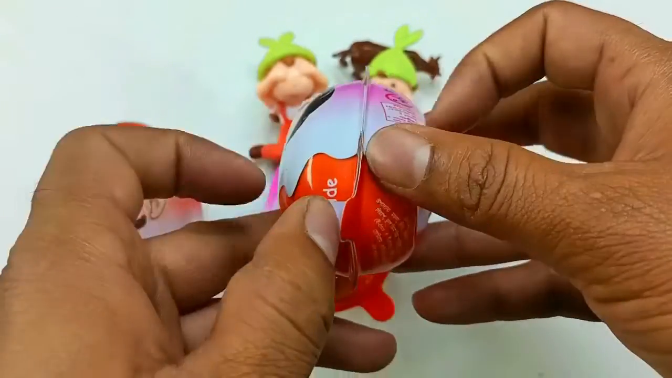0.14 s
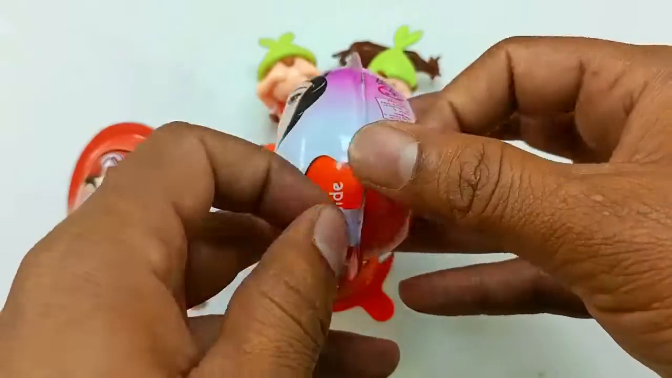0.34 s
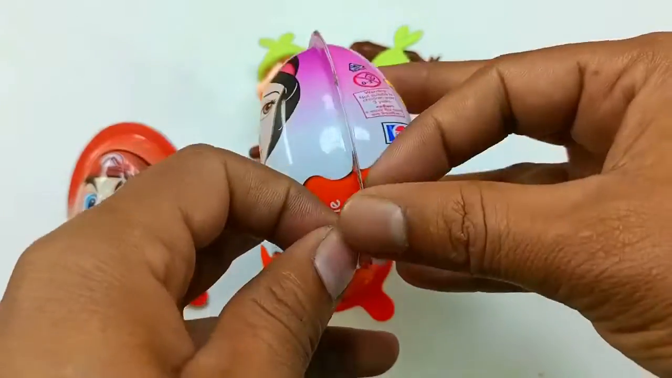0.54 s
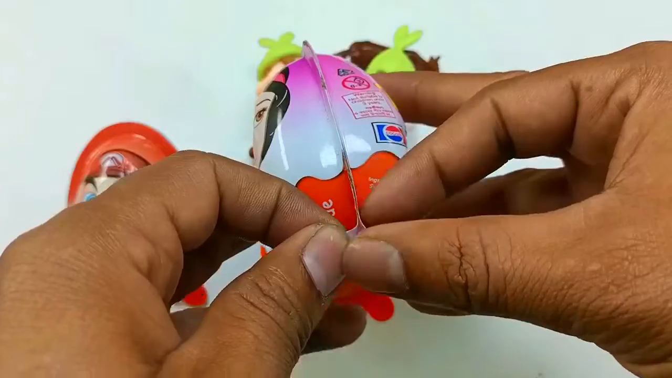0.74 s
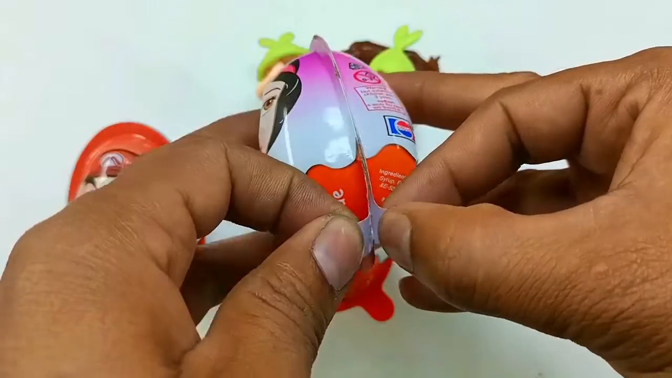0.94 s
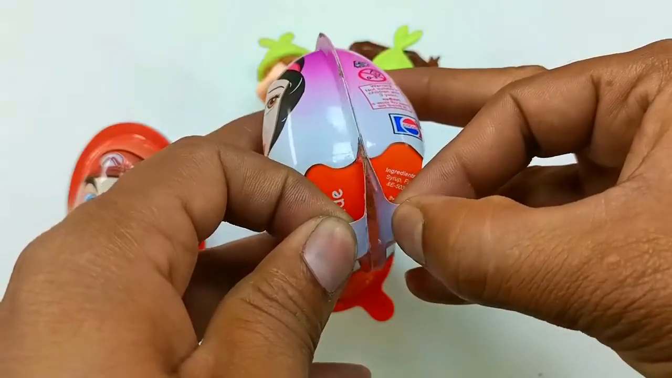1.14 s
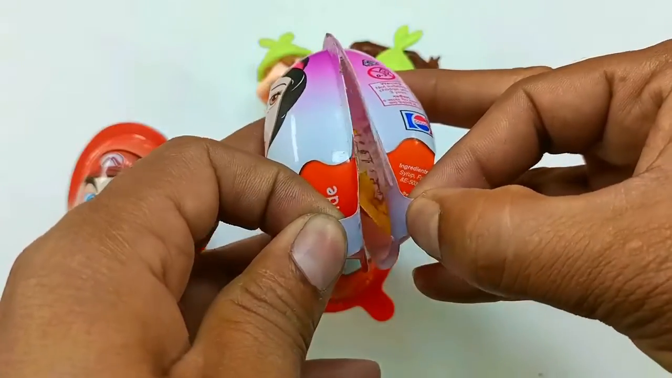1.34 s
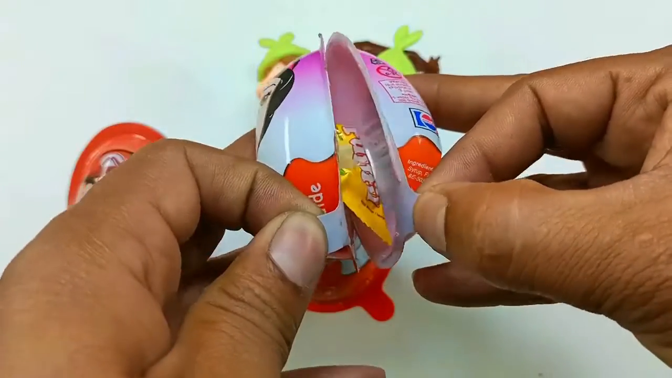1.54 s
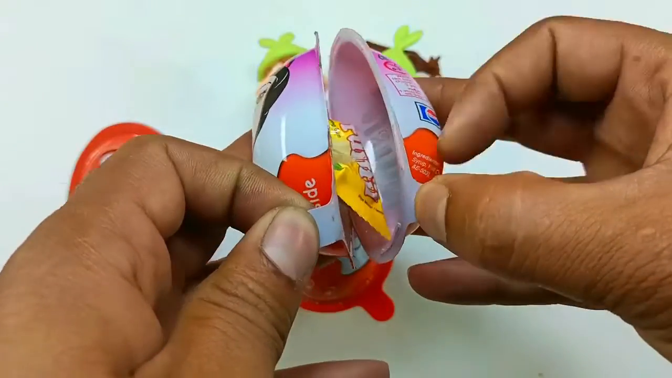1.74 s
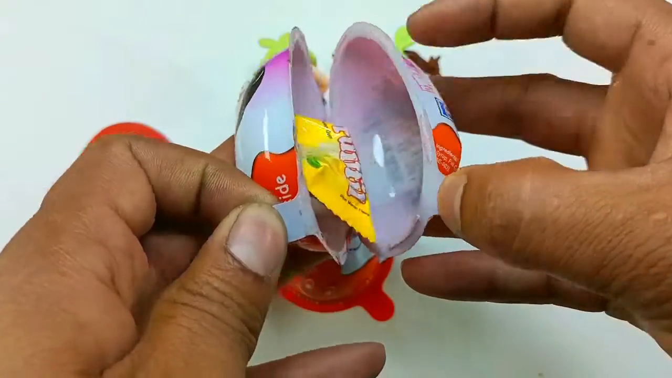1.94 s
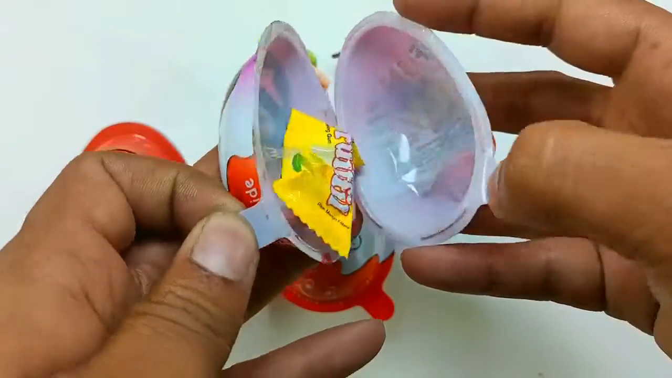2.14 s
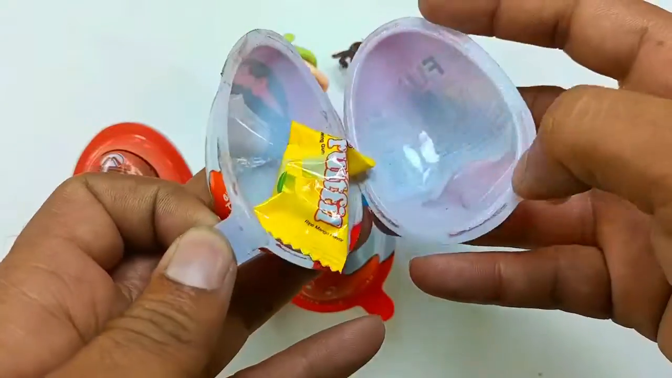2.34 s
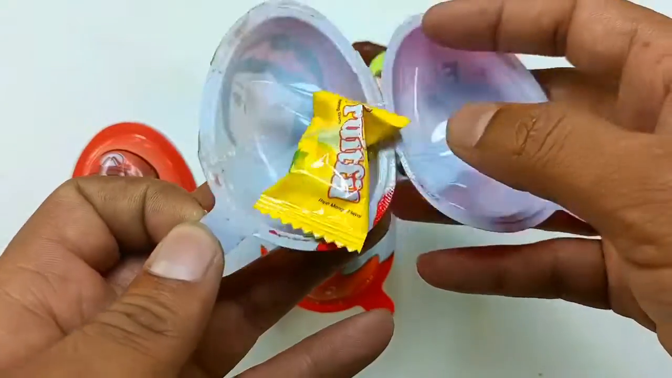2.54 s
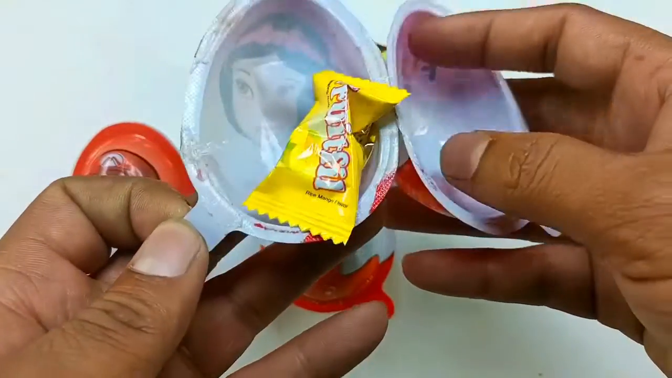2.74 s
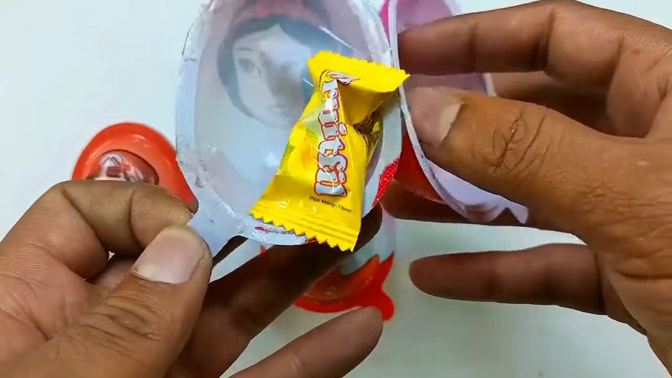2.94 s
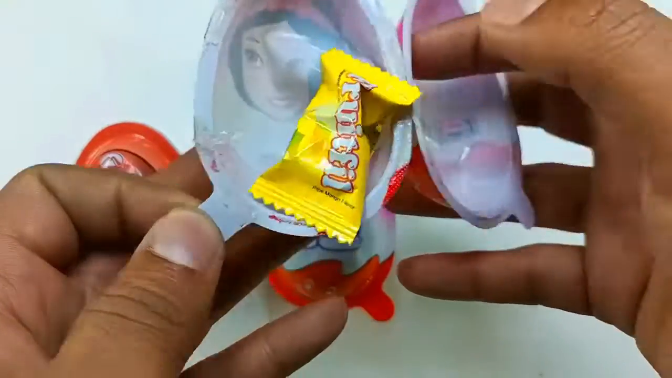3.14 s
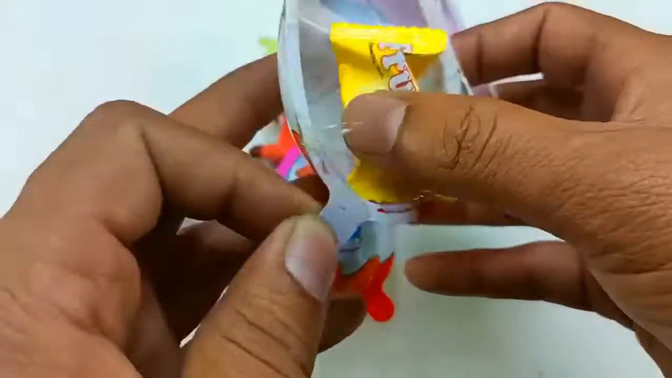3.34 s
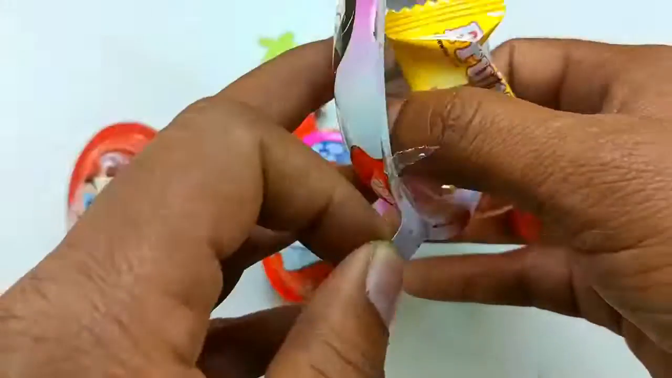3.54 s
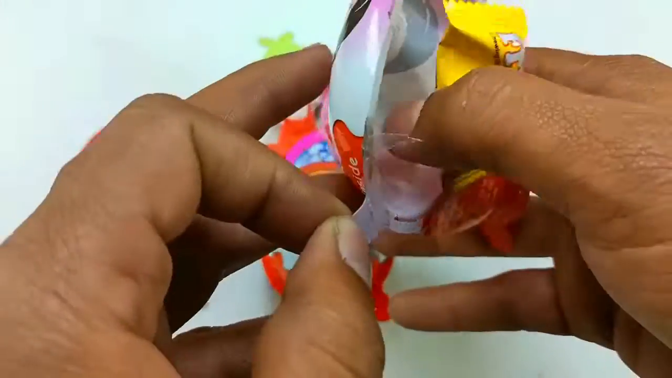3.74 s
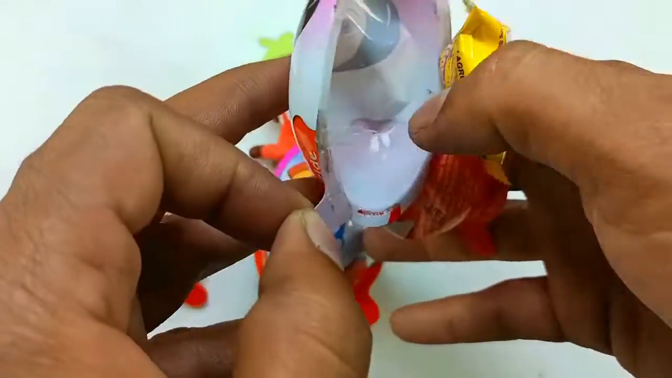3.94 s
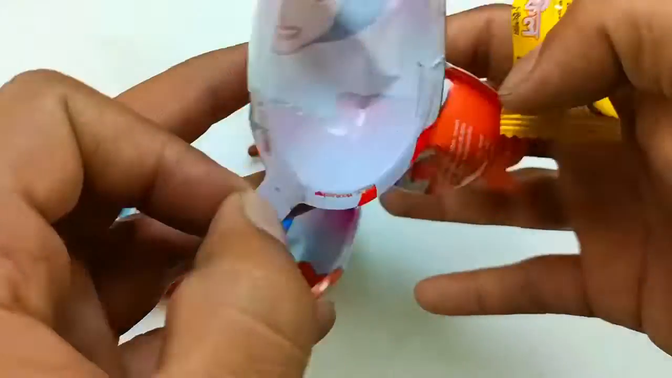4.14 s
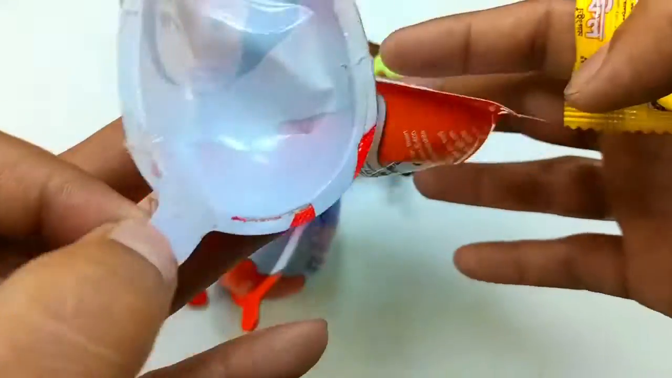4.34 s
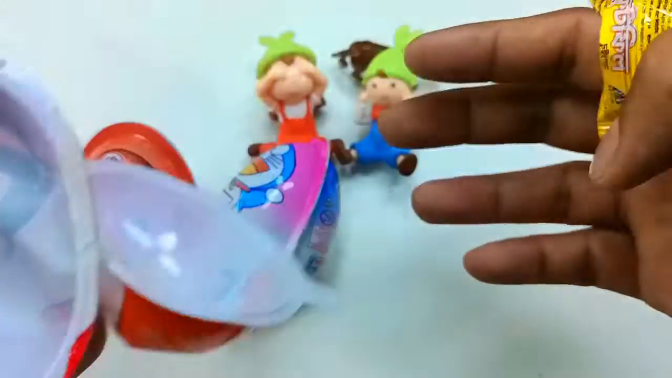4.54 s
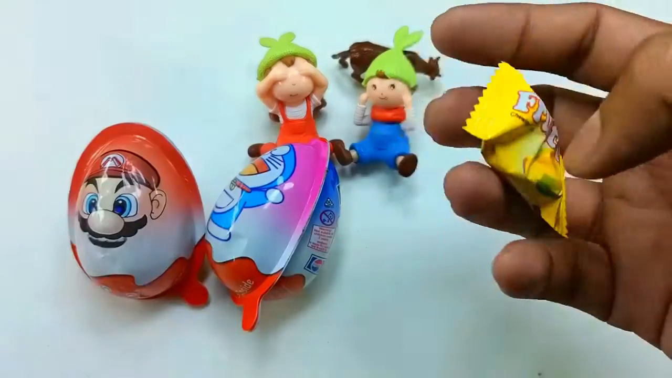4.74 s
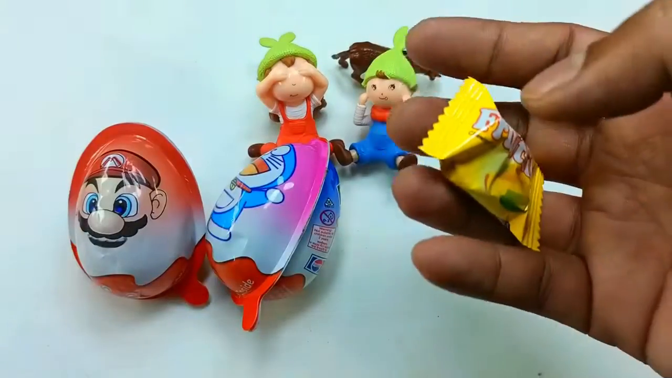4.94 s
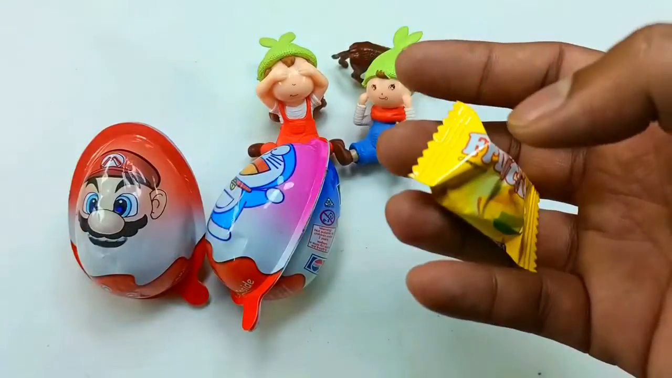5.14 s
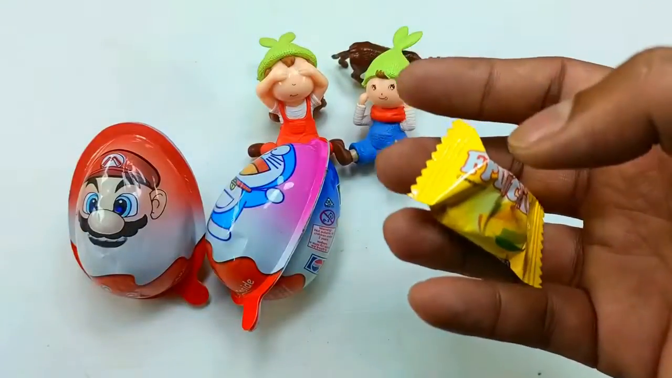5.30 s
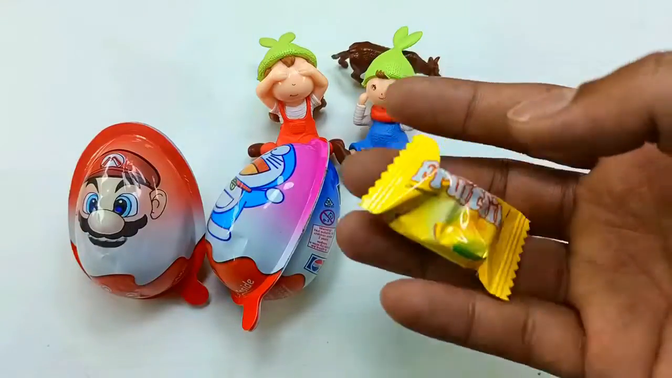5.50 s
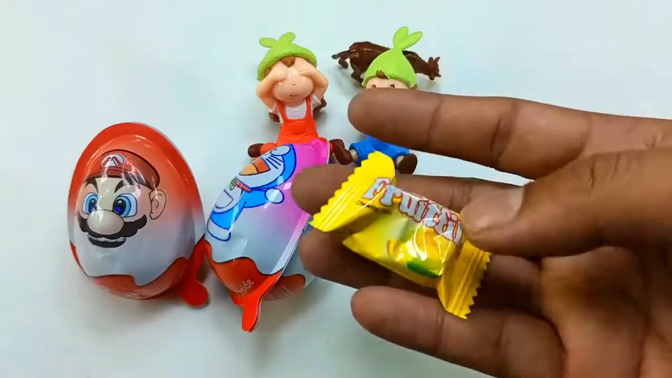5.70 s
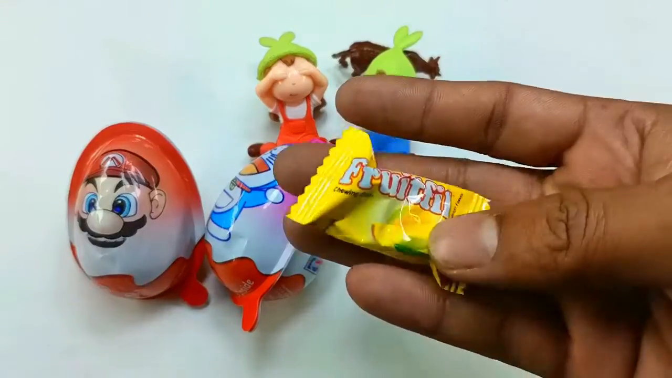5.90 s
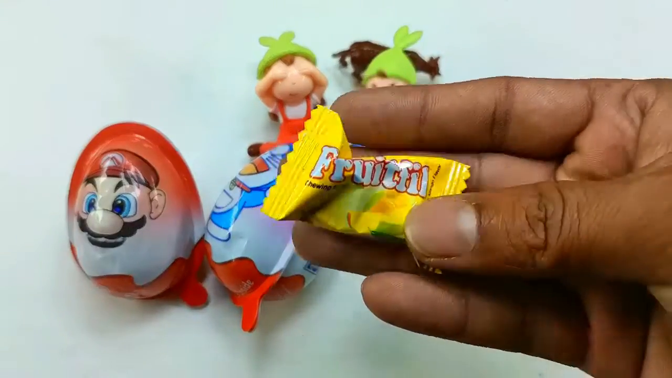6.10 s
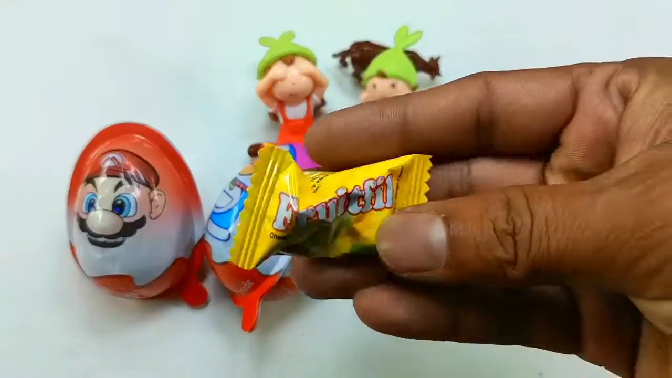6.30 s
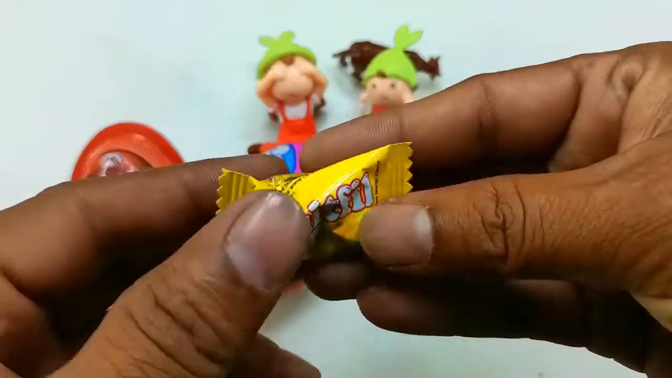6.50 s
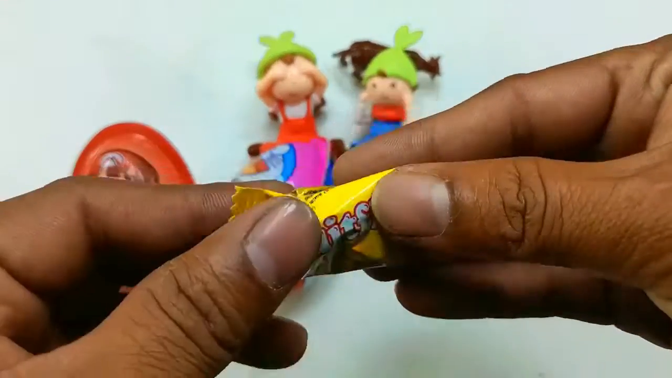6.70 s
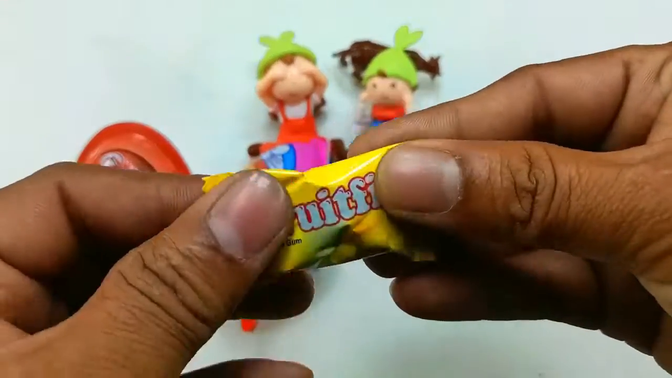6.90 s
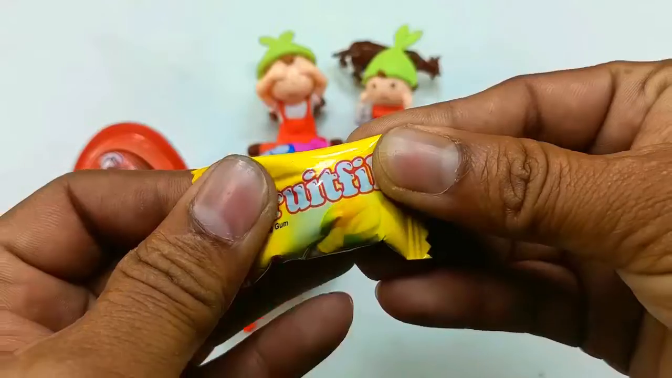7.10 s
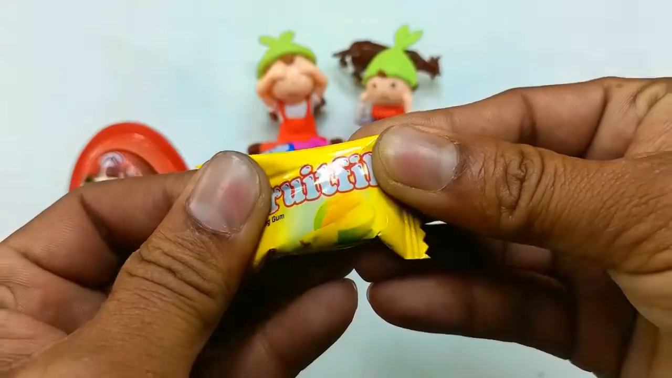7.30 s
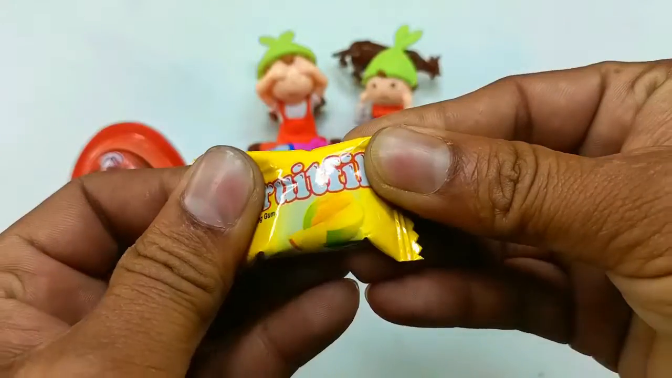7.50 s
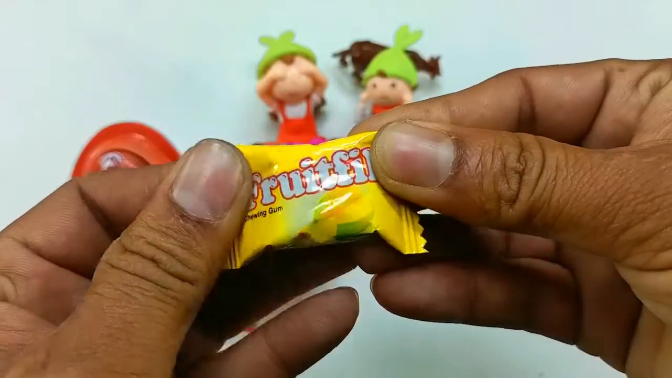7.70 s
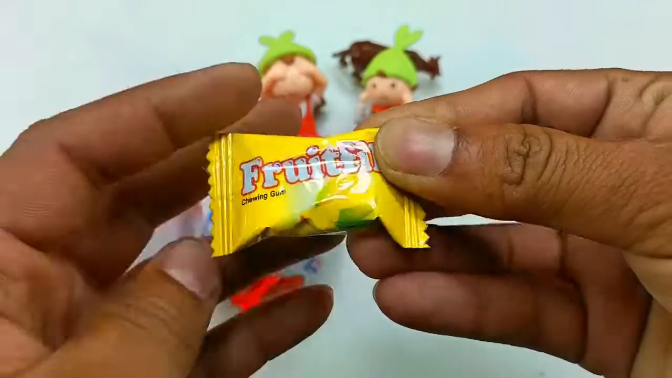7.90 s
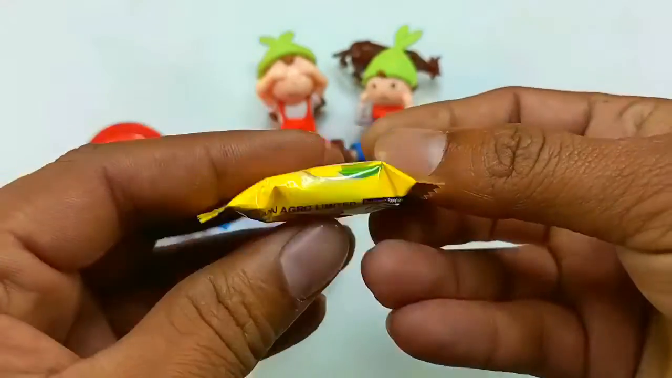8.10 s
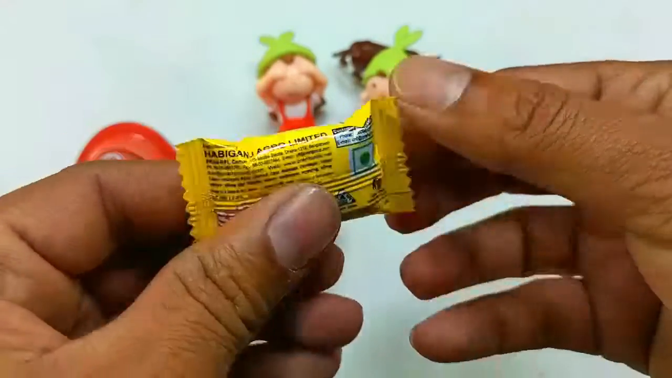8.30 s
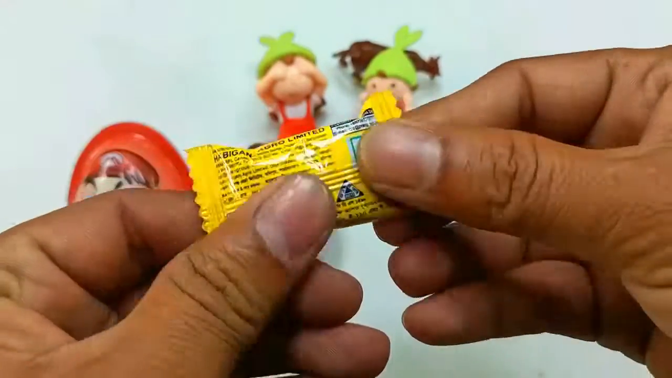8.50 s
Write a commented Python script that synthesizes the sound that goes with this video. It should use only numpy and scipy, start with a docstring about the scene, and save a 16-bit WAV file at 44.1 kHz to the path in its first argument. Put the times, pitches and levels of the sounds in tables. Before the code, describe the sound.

In a quiet indoor room with faint low hum, close stereo microphones catch fingertips rubbing thin plastic, with soft ticks and a slight squeak. Around 0.85 seconds the seam starts to crack; loud hollow pops burst out at 1.2, 1.4 and 1.6, each very short and dry with a brief room echo. From 2.1 to 3.6 the opened shell gives small clicks, rustles, tiny squeaks and dull finger bumps. A stronger hollow snap comes at 3.8, lighter cracks until 4.4, then faint scuffs as it is put down. Foil ticks softly at 4.8, and near-quiet follows, with a light crackle at 5.5 and gentle rubbing around 6. From 6.8 the wrapper crinkles, peaking in a bright, sharp burst at 7.05, with isolated snaps near 7.4 and 7.7, some carrying a low pulse. A dense crisp crackle fills 8.2 to 8.5.

```python
"""At a table in a quiet room, close to a pair of microphones, hands pry a thin plastic shell open,
turn it over, then press a small foil wrapper. The shell cracks (noise bursts) and rings in its hollow
(damped sines), the foil snaps brightly (wider noise bursts). Fingers rub, squeak and thud (filtered noise),
some snaps carry low pulses, and a hum lies under the room noise.
A noise gate lets the background sink whenever the hands are still."""
import sys
import numpy as np
from scipy import signal
from scipy.fft import rfft, irfft
from scipy.io import wavfile
from scipy.ndimage import uniform_filter1d

SR = 44100
rng = np.random.default_rng(int(sys.argv[2]) if len(sys.argv) > 2 else 0)


def digitize_waveform(pressure):
    """Quantize a signal to 16-bit integers and store it at the path in sys.argv[1].

    Rows of a 2-D input are taken as channels; values are limited to [-1, 1].
    """
    field = np.atleast_2d(pressure).T
    bounded = np.clip(field, -1, 1)
    quanta = np.round(bounded * 32767).astype(np.int16)
    wavfile.write(sys.argv[1], SR, quanta)


N = 377055

# Finger strokes over plastic and foil. Each row: start in seconds, length in seconds,
# dull body rustle in dB, bright skin rustle in dB (both rms before the swell of the stroke).
STROKES = [(0, 0.088, -65.5, -71), (0.22, 0.12, -61, -67), (0.436, 0.17, -55, -64),
           (0.629, 0.14, -63.5, -82), (0.8, 0.1, -59.5, -69.5), (1.065, 0.23, -65.5, -60.5),
           (1.53, 0.061, -53.5, -62), (2.072, 0.13, -68, -68), (2.17, 0.32, -58.5, -60),
           (2.46, 0.12, -64, -68.5), (2.634, 0.18, -53, -59.5), (2.778, 0.21, -72, -77.5),
           (3.052, 0.13, -56, -65), (3.348, 0.16, -68, -71), (3.469, 0.12, -48, -53),
           (3.613, 0.13, -46.5, -54.5), (3.743, 0.21, -69, -68.5), (3.963, 0.25, -63, -64.5),
           (4.101, 0.19, -65.5, -73.5), (4.288, 0.13, -65.5, -65), (4.496, 0.061, -63.5, -80),
           (4.82, 0.07, -59.5, -59.5), (5.514, 0.26, -67.5, -68), (5.761, 0.2, -64.5, -58.5),
           (5.853, 0.057, -62.5, -53.5), (5.959, 0.25, -65.5, -58), (6.059, 0.046, -64.5, -59),
           (6.167, 0.26, -78, -63.5), (6.397, 0.089, -80.5, -63), (6.491, 0.08, -81.5, -62.5),
           (6.594, 0.045, -79.5, -67.5), (6.664, 0.125, -79, -70), (6.786, 0.16, -58.5, -56),
           (6.991, 0.2, -67, -52), (7.868, 0.11, -56, -53.5), (8.236, 0.17, -50.5, -52)]

FOIL_FROM_S = 4.7   # the shell is put down, the wrapper taken up
LEAD_S = .008   # short rise ahead of each crack


def amp(db):
    """Decibels to gain."""
    return 10 ** (np.asarray(db) / 20)


def rms_one(x):
    """Scale to unit rms."""
    return x / np.sqrt(np.mean(x ** 2) + 1e-20)


def band(x, low_hz, high_hz):
    """Butterworth band-pass."""
    edges_hz = [low_hz, min(high_hz, .45 * SR)]
    return signal.sosfilt(signal.butter(2, edges_hz, "band", fs=SR, output="sos"), x)


def resonance(x, hz, width_hz):
    """Two-pole resonance with gain 1 on top."""
    r = np.exp(-np.pi * width_hz / SR)
    feedback = [1, -2 * r * np.cos(2 * np.pi * hz / SR), r * r]
    return signal.lfilter([(1 - r * r) / 2, 0, (r * r - 1) / 2], feedback, x)


def dying(seconds, t60):
    """Envelope falling 60 dB in t60 seconds."""
    return amp(-60 * np.arange(int(seconds * SR)) / SR / t60)


def stereo_noise(size, alike):
    """Two channels of noise whose correlation is alike, from 0 to 1."""
    mid, side = rng.standard_normal((2, size))
    alike = np.clip(alike, 0, 1)
    return np.sqrt((1 + alike) / 2) * mid + np.sqrt((1 - alike) / 2) * side * [[1], [-1]]


def add(out, s, burst, db):
    """Mix a burst in with its peak at the given level."""
    at = max(int(s * SR), 0)
    burst = burst[:, :N - at]
    out[:, at:at + burst.shape[1]] += amp(db) * burst / np.abs(burst).max()


def background():
    """Room noise and a slightly wavering mains hum, both stronger on the left."""
    # Spectrum of the room's air. Each row: frequency in Hz, relative density in dB per Hz.
    air_curve = np.array([(20, -14), (45, -11), (100, -11), (170, -16.5), (330, -23), (480, -20),
                          (850, -31), (2200, -34.5), (4000, -45), (16000, -50)])
    air_db, hum_db, hum_hz = -68.5, -69.5, 100.5   # rms levels ahead of the left-right tilt
    hz = np.maximum(np.arange(N // 2 + 1) * SR / N, 1)
    curve_db = np.interp(np.log(hz), np.log(air_curve[:, 0]), air_curve[:, 1])
    air = irfft(rfft(stereo_noise(N, 1.0)) * amp(curve_db), N)
    steady = np.sin(2 * np.pi * hum_hz * np.arange(N) / SR)
    waver = rms_one(resonance(stereo_noise(N, 0.11), hum_hz, 13.0))
    hum = steady + .5 * waver
    tilt = amp([[1.2], [-1.2]])
    return (amp(air_db) * rms_one(air) + amp(hum_db) * rms_one(hum)) * tilt


def ring_hz(s):
    """Pitch of the hollow at a moment: it follows how the shell is held open."""
    # Ring pitch, gliding from row to row. Each row: time in seconds, pitch in Hz.
    pitch_path = [(0, 1381), (2.6, 1529), (2.9, 1767), (3.5, 1410), (3.8, 2015), (5, 2030)]
    return np.interp(s, *np.transpose(pitch_path))


def lumps(size, count):
    """Uneven grip: count small slips a second that swell and die in a few ms over a steady drag."""
    slip_db = 3.3 * np.minimum(rng.exponential(1, size), 4)
    slips = (rng.random(size) < count / SR) * amp(slip_db)
    return 1 + signal.lfilter([.02], [1, -1.98, .9801], slips)


def rubbing():
    """Skin drags over plastic or foil: strokes swell and fade, a dull rustle under a bright hiss."""
    # Dull resonances. Each row: ratio to the ring pitch, width in Hz, relative level in dB.
    body_modes = [(.45, 402.8, -13.5), (1, 496.7, -4.5), (1.35, 598, -10.5)]
    # Bright bands of the skin. Each row: low edge in Hz, high edge in Hz, relative level in dB.
    skin_bands = [(2485, 3800, 0.5), (4420, 6550, 4), (8200, 12800, 1)]
    foil_grip = .5   # skin slides more evenly on foil: exponent on the lumps of the bright hiss
    out = np.zeros((2, N))
    for s, length, body_db, bright_db in STROKES:
        at = max(int(s * SR), 0)
        arch = np.sin(np.linspace(0, np.pi, int(length * SR))[:N - at]) ** 0.5
        size = len(arch)
        noise = stereo_noise(size, 0.26)
        together = lumps(size, count=45)   # slips shared by rustle and hiss
        grip = foil_grip if s > FOIL_FROM_S else 1
        body, bright = 0, 0
        for ratio, width, db in body_modes:
            hz = ratio * ring_hz(s)
            rustle = resonance(resonance(noise, hz, width), hz, 2.1 * width)
            body = body + amp(db) * lumps(size, count=40) * rustle
        for low_hz, high_hz, db in skin_bands:
            hiss = band(noise, low_hz, high_hz)
            bright = bright + amp(db) * lumps(size, count=50) ** grip * hiss
        stroke = amp(body_db) * rms_one(body * together)
        stroke = stroke + amp(bright_db) * rms_one(bright * together ** grip)
        out[:, at:at + size] += arch * stroke
    return out


def crack(low_hz, high_hz, t60, alike):
    """A faint noise swells, then a short burst; each facet favours a pitch of its own."""
    lead = amp(-21) * dying(LEAD_S, 0.016)[::-1]
    shape = np.concatenate([lead, dying(0.043, t60)])
    noise = stereo_noise(len(shape), alike) * shape
    noise[:, len(lead)] += 1.5   # a one-sample click starts the burst
    facet_hz = low_hz * (high_hz / low_hz) ** rng.uniform(0.085, .9)
    facet = resonance(noise, facet_hz, .3 * facet_hz)
    return band(noise + amp(-4) * facet, low_hz, high_hz)


def scattered(runs, per_s):
    """Random snaps within each run, as rows of start in seconds, bright dB, dull dB."""
    dull_db, spread_db = -3.5, 6   # dull part against bright part; sizes vary up to this either way
    rows = []
    for s, length, db in runs:
        count = max(round(per_s * length), 1)
        for when, size, dull in rng.random((count, 3)):
            level_db = db + spread_db * (2 * size - 1)
            duller_db = level_db + dull_db + spread_db * (2 * dull - 1)
            rows.append((s + when * length, level_db, duller_db))
    return rows


def stray_ticks():
    """Every stroke on the shell lets a few small creases click, louder the harder the skin drags."""
    over_db, ticks_per_s = 6, 14   # mean tick peak over the stroke's hiss
    runs = [(s, length, db + over_db) for s, length, _, db in STROKES if s < FOIL_FROM_S]
    return scattered(runs, ticks_per_s)


def shell():
    """Each crack is a bright tick, the damped modes of the hollow halves, and a broad plastic rattle."""
    # Cracks and ticks. Each row: time in seconds, bright crack peak in dB, hollow ring peak in dB.
    shell_cracks = [(0.1731, -58.5, -46), (0.426, -57, -42.5), (0.4851, -59, -31), (0.588, -45.5, -39),
                    (0.852, -36.5, -29.5), (1.1269, -31.5, -42.5), (1.2047, -13.5, -11.5),
                    (1.2415, -29.5, -25), (1.396, -21.5, -1.5), (1.415, -20.5, -9), (1.5433, -47, -27.5),
                    (1.5599, -35.5, -26.5), (1.6189, -22, -2.5), (1.6338, -28.5, -22),
                    (1.792, -39.5, -40.5), (2.0678, -46, -47), (2.1874, -31, -28), (2.195, -26.5, -36),
                    (2.23, -29, -29), (2.294, -27.5, -31), (2.376, -26, -30.5), (2.394, -27.5, -36),
                    (2.423, -37, -29.5), (2.634, -36, -41.5), (2.7093, -31, -28.5), (2.7652, -46, -34),
                    (3.0645, -42.5, -34), (3.096, -39, -35), (3.129, -37, -51), (3.1988, -40, -41),
                    (3.242, -38.5, -42.5), (3.2851, -45, -40.5), (3.3597, -45.5, -39.5), (3.4305, -37, -55),
                    (3.477, -34, -38), (3.493, -32.5, -37), (3.519, -41, -36), (3.663, -28.5, -36),
                    (3.685, -25.5, -24.5), (3.8224, -18.5, -10), (3.984, -34.5, -35), (4.018, -40, -37),
                    (4.0767, -36.5, -35.5), (4.1327, -21, -26.5), (4.1405, -25, -25.5),
                    (4.3924, -52, -42.5)]
    # Modes of the hollow. Each row: ratio to the ring pitch, 60 dB decay in seconds, relative level in dB.
    hollow_modes = [(.6, .010, -17), (1.0, .0065, 0), (1.42, .012, -13)]
    rattle_db = -10   # against the ring
    out = np.zeros((2, N))
    t = np.arange(int(.04 * SR)) / SR
    onset = (1 - np.exp(-t / .0006)) ** 2   # the seam gives way over a cycle or two
    for s, crack_db, ring_db in shell_cracks + stray_ticks():
        hz = ring_hz(s) * np.exp(rng.normal(0, .03))   # the grip detunes it
        add(out, s - LEAD_S, crack(1800, 15000, 0.007, 0.42), crack_db)
        add(out, s - LEAD_S, crack(.55 * hz, 2.2 * hz, 0.022, .85), ring_db + rattle_db)
        rings = 0
        for ratio, t60, db in hollow_modes:
            vary_db = 2.0 * rng.normal(0, 1, (2, 1))   # each mode and side differs
            rings = rings + amp(db + vary_db) * np.sin(2 * np.pi * ratio * hz * t) * dying(.04, t60)
        add(out, s, band(rings * onset, 0.49 * hz, 12.0 * hz), ring_db)
    return out


def squeaks():
    """Stick and slip of skin: a short swell of narrow noise around one pitch."""
    # Fingertips on smooth plastic. Each row: start in seconds, length in seconds, pitch in Hz, peak in dB.
    squeak_rows = [(0.281, 0.042, 1680, -44.5), (0.525, 0.041, 1710, -35), (2.672, 0.016, 1450, -41),
                   (2.73, 0.015, 1800, -34), (2.825, 0.031, 1800, -44.5), (3.641, 0.026, 1670, -28.5),
                   (4.339, 0.033, 1890, -44), (5.88, 0.031, 1970, -45)]
    width_hz = 255
    out = np.zeros((2, N))
    for s, length, hz, db in squeak_rows:
        swell = np.hanning(int(length * SR)) ** .5
        noise = stereo_noise(len(swell), 1.0)
        tone = resonance(resonance(noise, hz, width_hz), hz, 2 * width_hz)
        add(out, s, tone * swell, db)
    return out


def thud(hz):
    """A dull, noisy knock that lasts a few cycles of its pitch."""
    shape = dying(0.14, 0.018 + 8.0 / hz)
    knock = band(stereo_noise(len(shape), 1.0) * shape, 0.5 * hz, 1.9 * hz)
    return band(knock, 0.63 * hz, 5000)


def bumps():
    """Soft flesh gives dull thuds; scuffs and rolls give a longer rumble."""
    # Dull bumps of fingers. Each row: time in seconds, peak in dB, pitch in Hz.
    bump_rows = [(0.483, -40, 576), (1.203, -27, 467), (1.619, -20.5, 431), (2.766, -43, 338),
                 (2.988, -50.5, 780), (3.062, -48.5, 208), (3.096, -37.5, 283), (3.356, -41.5, 365),
                 (4.135, -42.5, 364)]
    # Knuckles scuffing the table, the pack rolling into the palm.
    # Each row: start in seconds, length in seconds, peak in dB, centre in Hz.
    scuff_rows = [(4.301, 0.12, -47.5, 196), (4.508, 0.064, -45.5, 387), (5.519, .07, -37, 553)]
    out = np.zeros((2, N))
    for s, db, hz in bump_rows:
        add(out, s, thud(hz), db)
    for s, length, db, hz in scuff_rows:
        roll = np.concatenate([np.linspace(1, .4, int(length * SR)), 0.33 * dying(0.11, 0.055)])
        add(out, s, band(stereo_noise(len(roll), 0.55) * roll, 0.39 * hz, 1.9 * hz), db)
    return out


def pops():
    """Some snaps carry one dry low pulse, from bass to middle, mostly on the left."""
    # Low pulses. Each row: time in seconds, peak in dB.
    pop_rows = [(3.682, -26.5), (6.878, -27), (7.056, -10), (7.377, -17), (7.673, -19), (7.771, -32.5),
                (8.43, -30)]
    out = np.zeros((2, N))
    pulse = band(dying(.04, 0.00073) * [[1], [.2]], 100, 760)
    for s, db in pop_rows:
        add(out, s, -pulse, db)
    return out


def foil():
    """Foil creases snap broadly: a bright crack over a duller one."""
    # Single snaps. Each row: time in seconds, bright crack peak in dB, mid crack peak in dB.
    foil_snaps = [(4.794, -37, -45.5), (4.802, -41, -38.5), (4.829, -38.5, -46.5), (4.839, -45, -36),
                  (5.5185, -30.5, -28.5), (5.972, -27, -43), (6.0334, -34.5, -39.5), (6.8045, -24.5, -43),
                  (6.8325, -28, -25.5), (6.8516, -27, -28), (6.8785, -15.5, -16.5), (6.92, -20.5, -33),
                  (6.931, -31, -35), (6.9553, -33, -18.5), (7.0019, -18, -25), (7.0252, -14.5, -53),
                  (7.0293, -16, -26), (7.057, -2.5, -8.5), (7.0757, -5.5, -26), (7.084, -9, -28),
                  (7.1064, -16.5, -49.5), (7.1383, -19, -51.5), (7.165, -25, -37.5), (7.3768, -3.5, -18),
                  (7.3921, -16.5, -31), (7.594, -44.5, -62.5), (7.673, -5.5, -19), (7.754, -25, -42),
                  (7.771, -12.5, -29.5), (7.9245, -17.5, -27), (8.039, -31.5, -59), (8.16, -33.5, -37.5),
                  (8.193, -27, -45.5), (8.1992, -23.5, -28), (8.253, -18, -23.5), (8.2798, -24.5, -24),
                  (8.289, -27, -29), (8.306, -38, -33), (8.326, -24, -33), (8.342, -26.5, -34),
                  (8.354, -24, -41), (8.3594, -24, -21), (8.364, -22.5, -40), (8.389, -19.5, -31),
                  (8.415, -18, -23), (8.421, -32, -28), (8.43, -9.5, -9.5), (8.442, -34, -19.5),
                  (8.488, -17, -21), (8.497, -21.5, -33), (8.5115, -39, -16), (8.536, -27, -41)]
    # Wrapper squeezed into runs of small random snaps.
    # Each row: start in seconds, length in seconds, mean bright peak in dB.
    crumple_runs = [(4.848, 0.036, -47), (6.818, 0.059, -27), (6.99, .18, -41)]
    out = np.zeros((2, N))
    for s, crack_db, mid_db in foil_snaps + scattered(crumple_runs, per_s=70):
        add(out, s - LEAD_S, crack(2590, 16600, 0.008, 0.14), crack_db)
        add(out, s - LEAD_S, crack(1100, 2990, 0.0087, 0.45), mid_db)
    return out


def tail(db, t60):
    """Decay that gives noise the stated total energy, whatever its length."""
    return amp(db) * dying(.5, t60) / np.sqrt(t60 * SR / np.log(1e6))


def room(x):
    """Quick reflections off table and hands, then the diffuse tail of the room."""
    near = tail(db=-8.5, t60=0.033)
    far = tail(db=-12.5, t60=0.31)
    low = tail(db=-7, t60=0.35)   # the lower middle lingers
    top_hz = 7500
    top = far * dying(.5, 0.94)   # the treble loses a further 60 dB in 0.94 s
    noise = stereo_noise(len(far), 0.016)
    echo = noise * near
    echo = echo + band(noise * far, 100, top_hz)
    echo = echo + band(noise[::-1] * top, top_hz, 18000)
    echo = echo + band(stereo_noise(len(low), 0.39) * low, 320, 850)
    echo[:, :60] = 0   # samples of silence before the first reflection
    return signal.fftconvolve(band(x, 290, 18000), echo, axes=1)[:, :N]


def scene():
    """Hand sounds with their room, and dry low pulses, over the background."""
    right_lag = 8   # samples, the hands sit nearer the left capsule
    hands = shell() + foil() + bumps() + rubbing() + squeaks()
    hands = hands + room(hands) + pops()
    hands[1] = np.roll(hands[1], right_lag)
    return hands + background()


def record(dry):
    """Capsule colour, a gate that opens on sound above the hum, soft peaks, a steep top cut."""
    # Colour of the two capsules. Each row: centre in Hz, width in Hz, left gain in dB, right gain in dB.
    capsule_colour = [(5390, 1800, -4, 7), (7530, 1300, -6.5, 3.5), (9520, 950, 13, -20),
                      (11200, 2600, -0.5, -14.5)]
    x = dry
    for hz, width, left_db, right_db in capsule_colour:
        x = x + (amp([[left_db], [right_db]]) - 1) * resonance(x, hz, width)
    power = np.mean(band(x, 590, 15000) ** 2, axis=0)
    level_db = 10 * np.log10(uniform_filter1d(power, size=441) + 1e-12)
    fall_db = 200 * np.arange(N) / SR   # release of 200 dB per s
    held_db = np.maximum.accumulate(level_db + fall_db) - fall_db
    # below -61 dB the gate closes by 0.62 dB per dB, down to -12 dB
    gain_db = uniform_filter1d(np.clip(0.62 * (held_db + 61), -12, 0), size=221)
    x = x * amp(gain_db)
    x = .95 * np.tanh(x / .95)   # the loudest peaks are rounded
    return signal.sosfilt(signal.cheby2(12, 70, 17000, fs=SR, output="sos"), x)


dry = scene()
out = record(dry)
digitize_waveform(out)
```